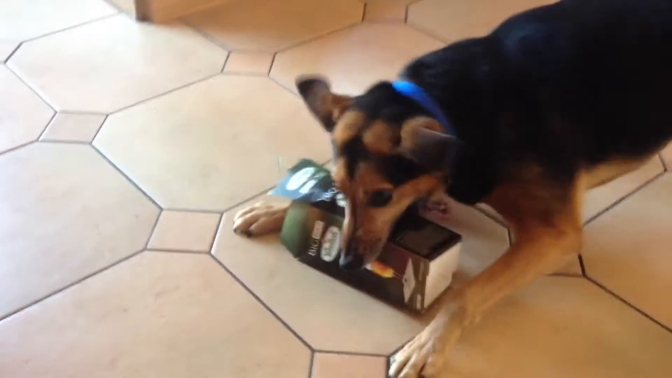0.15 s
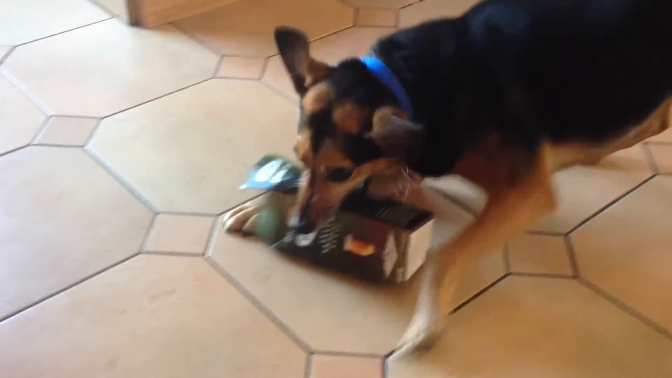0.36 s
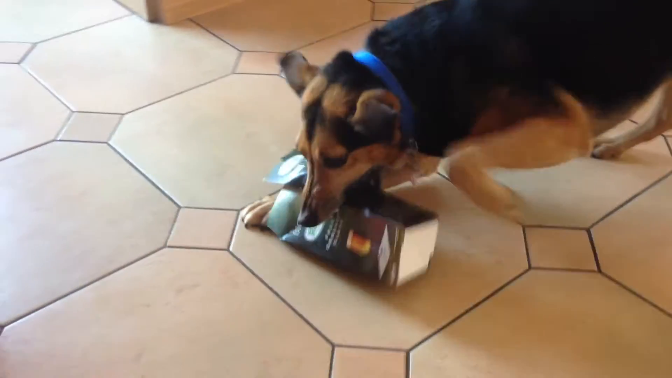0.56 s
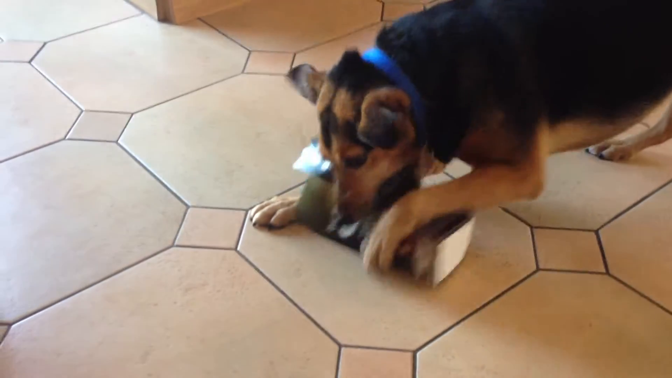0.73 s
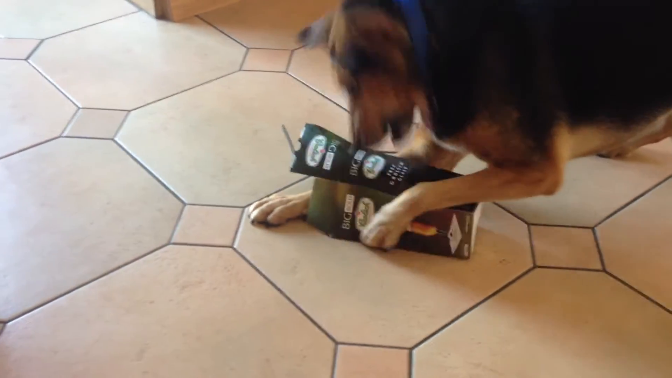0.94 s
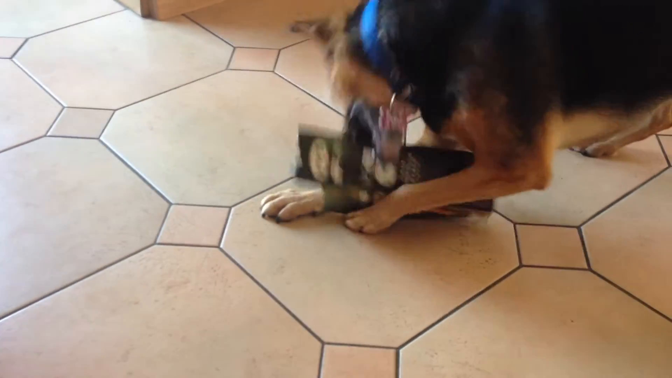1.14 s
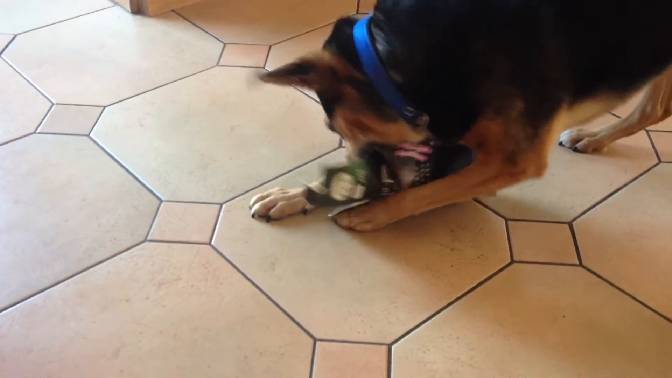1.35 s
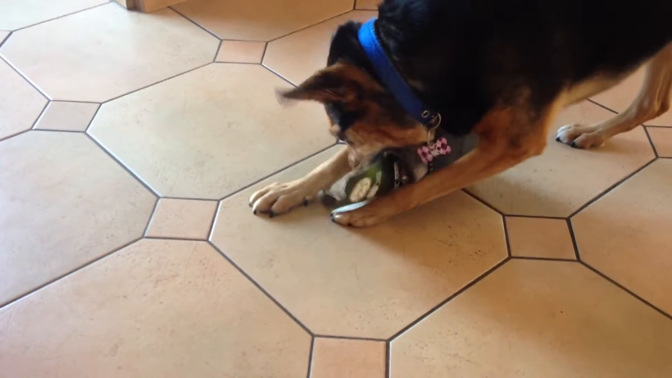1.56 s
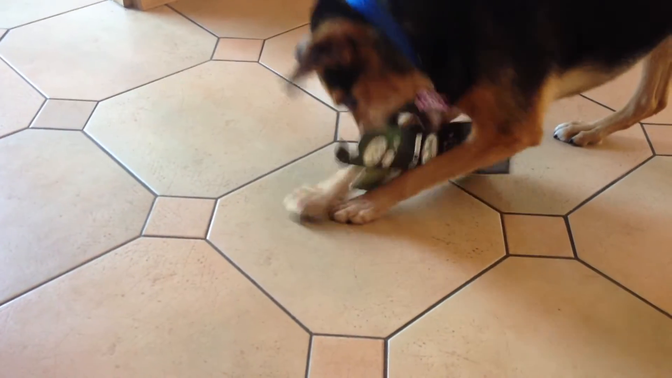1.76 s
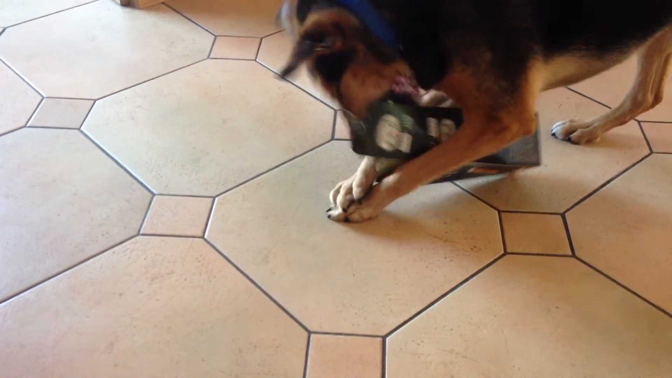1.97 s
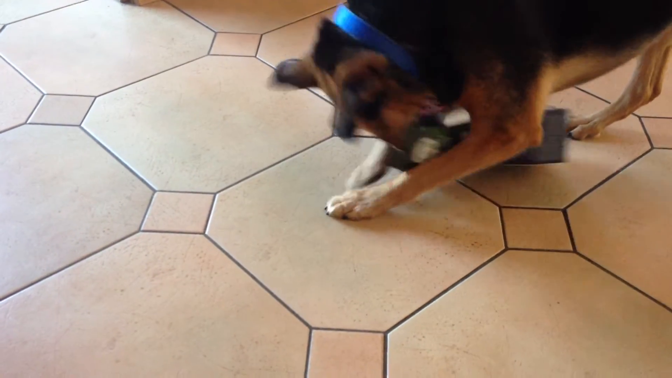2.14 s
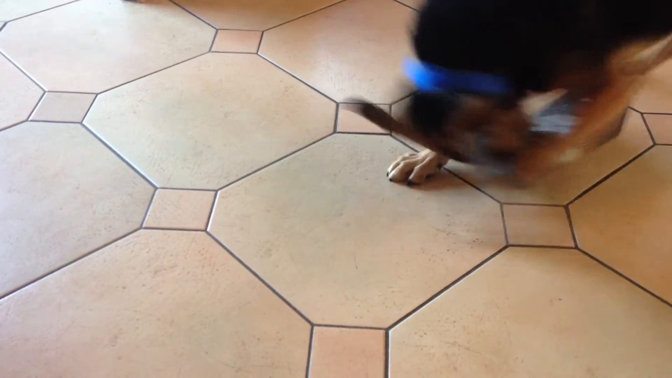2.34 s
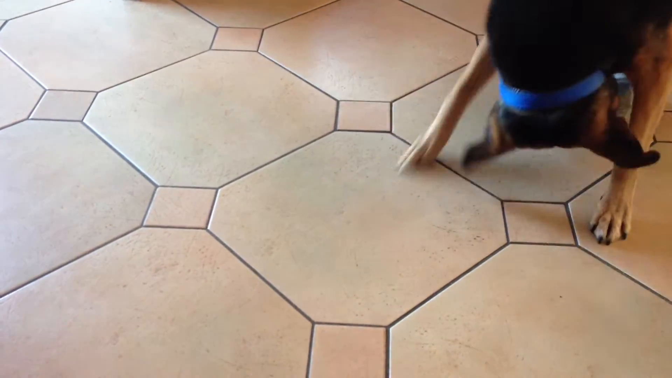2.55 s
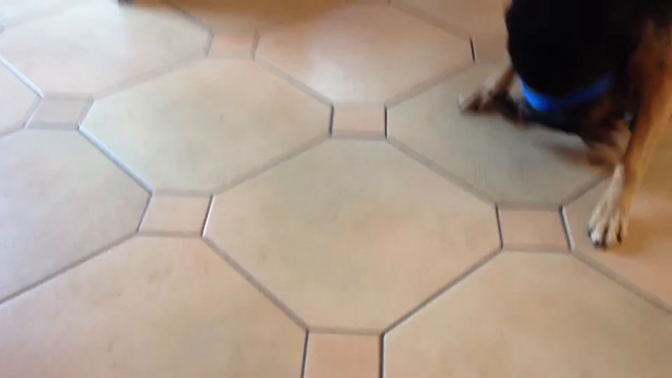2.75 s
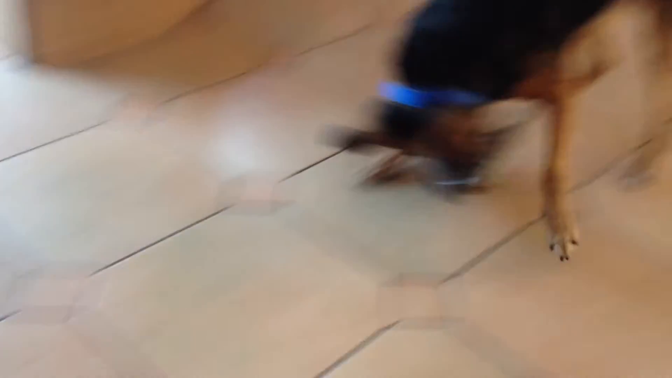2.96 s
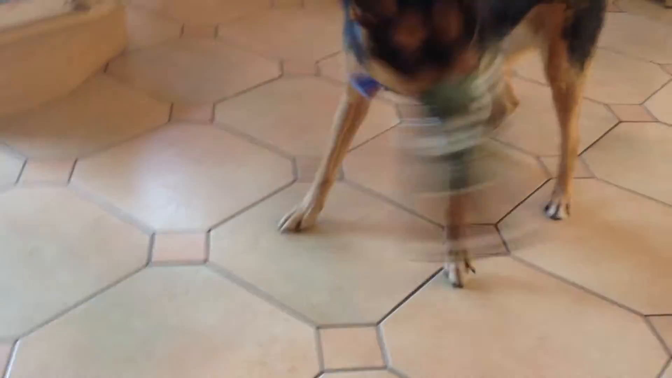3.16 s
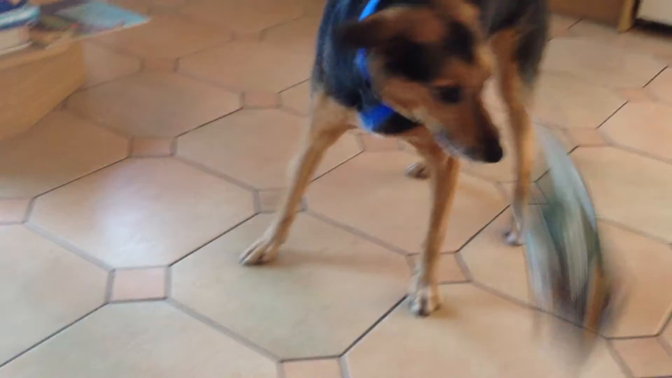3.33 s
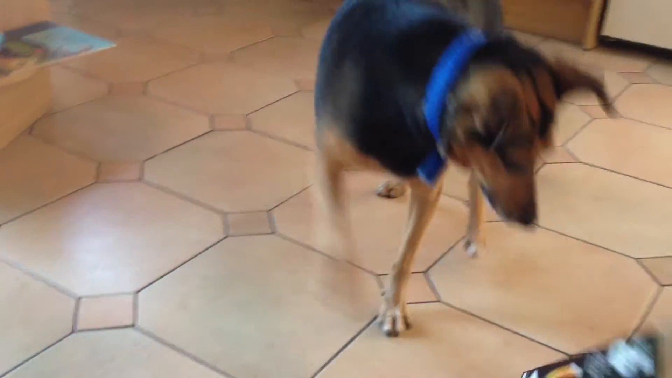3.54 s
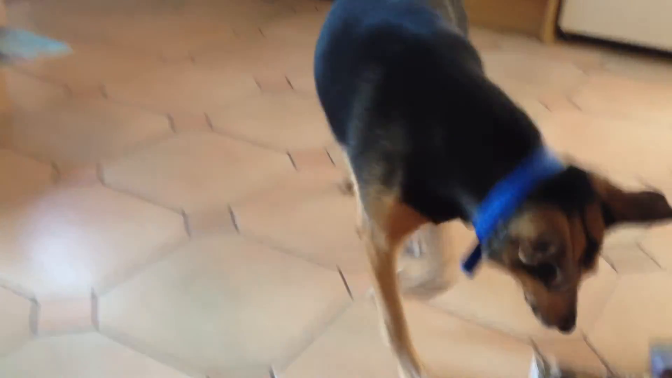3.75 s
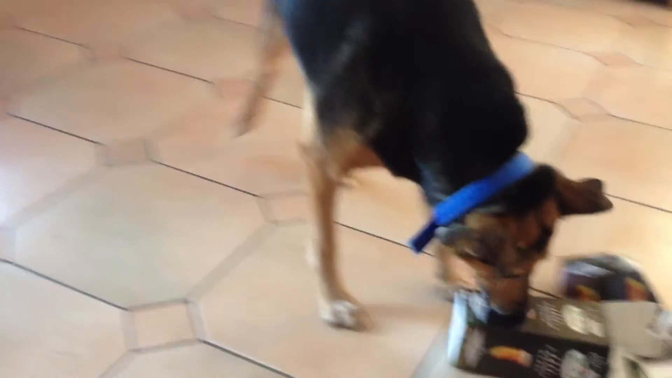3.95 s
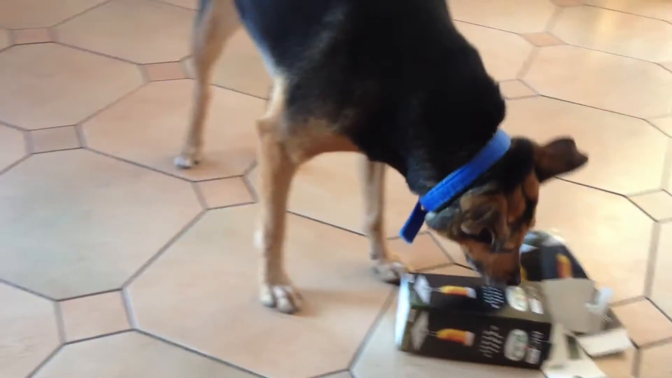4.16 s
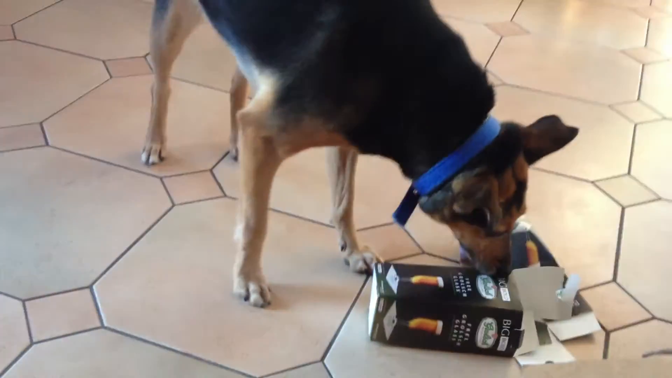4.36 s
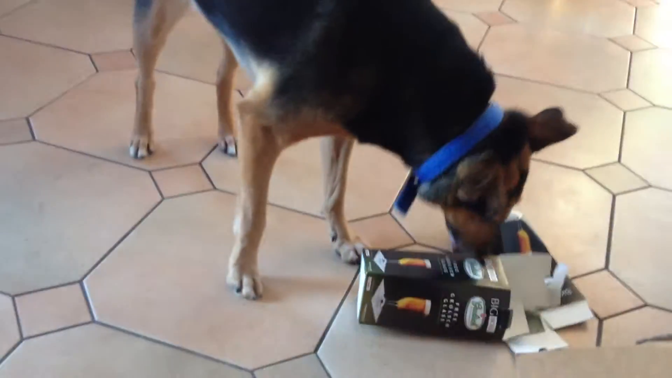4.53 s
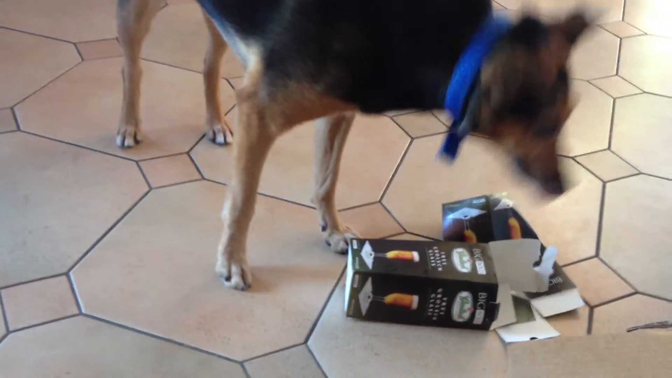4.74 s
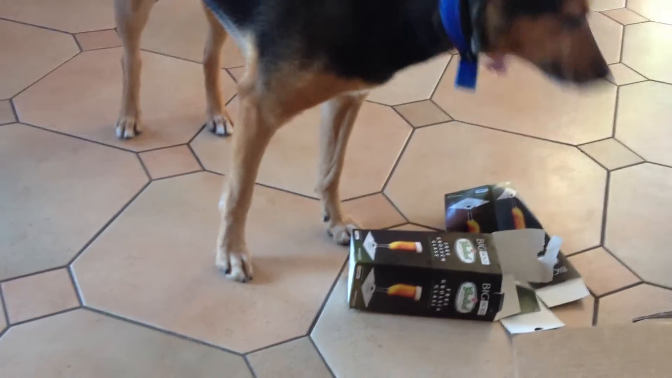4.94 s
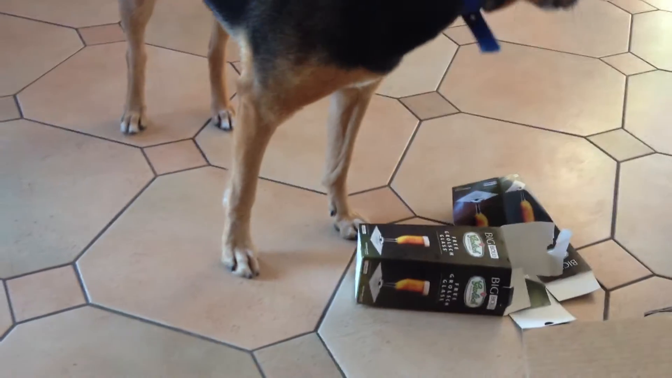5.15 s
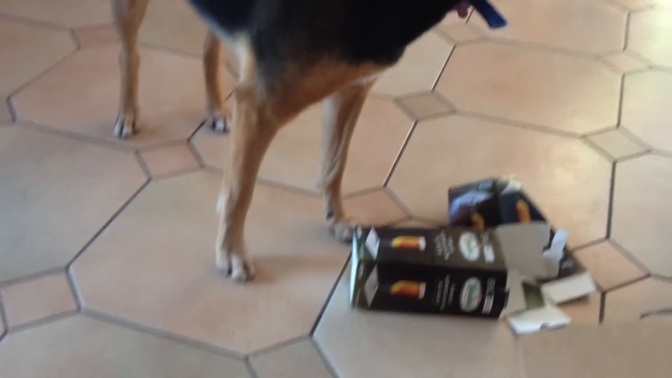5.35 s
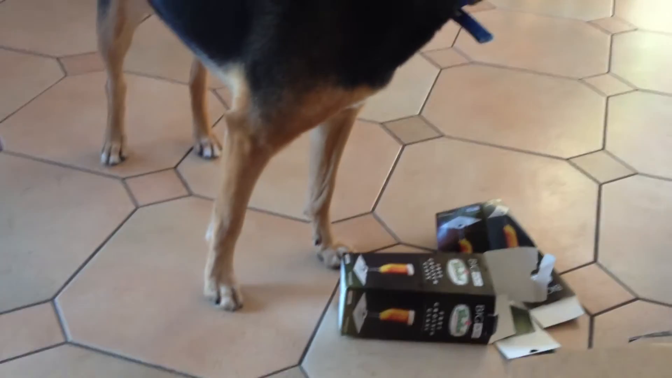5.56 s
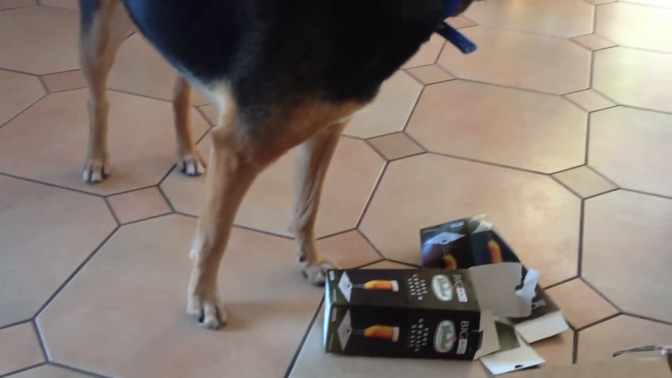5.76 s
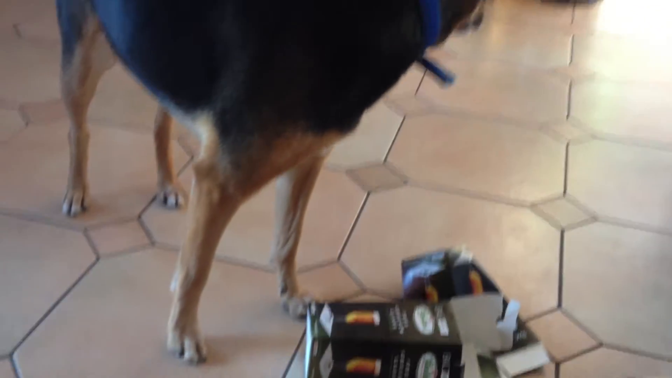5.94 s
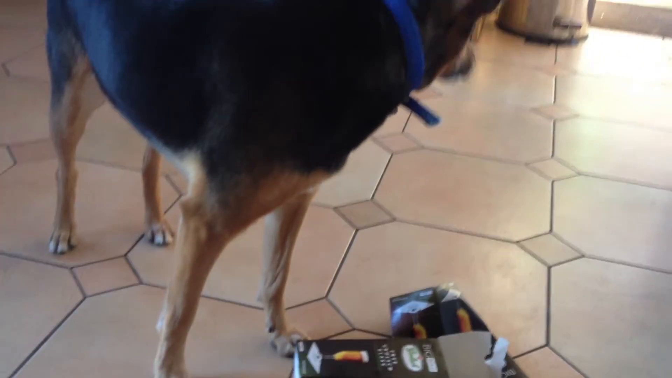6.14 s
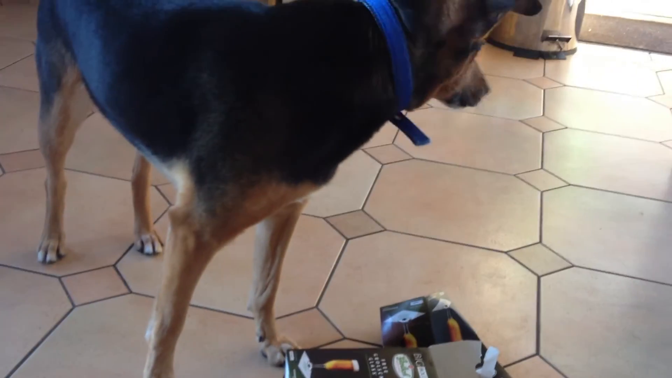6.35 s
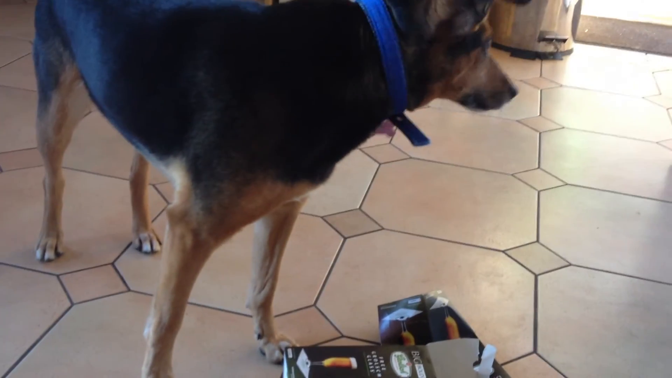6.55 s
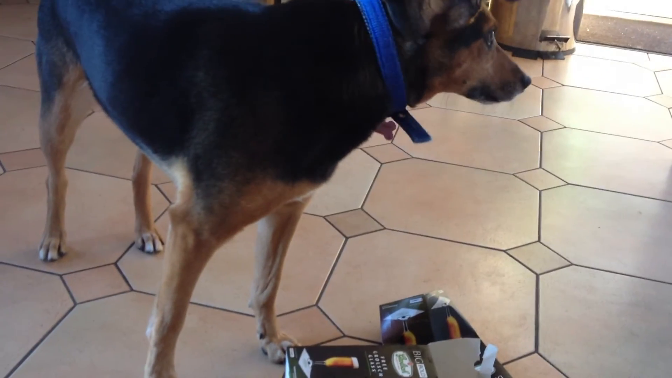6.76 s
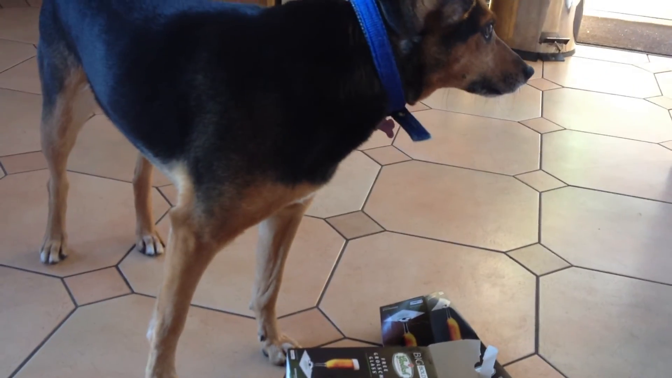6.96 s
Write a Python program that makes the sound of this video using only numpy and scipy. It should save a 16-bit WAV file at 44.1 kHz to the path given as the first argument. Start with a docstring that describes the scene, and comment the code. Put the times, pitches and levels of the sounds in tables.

```python
"""A dog paws, bites, drags and rips a cardboard box on a tiled floor: filtered bursts over stick-slip noise.
Collar tags ring as high sine modes, claws tick, glossy board squeaks, and a noise tail rings as the room.
Then the box is flung: it lands and bounces twice, its hollow ringing, and slides after each landing.
Toward the end gliding whistles and buzzy notes are left, probably birds outside the door.
Still room air and a faint hum lie under everything."""
import sys
import numpy as np
from scipy import signal
from scipy.fft import rfft, irfft, next_fast_len
from scipy.io import wavfile
from scipy.ndimage import map_coordinates

SR = 44100
rng = np.random.default_rng(int(sys.argv[2]) if len(sys.argv) > 2 else 0)


def materialize(psi):
    """Save the field psi as 16-bit PCM at rate SR to the path in sys.argv[1].

    A 1-D psi becomes a single channel; in a 2-D psi each row is a channel.
    """
    bounded = np.clip(np.atleast_2d(psi).T, -1, 1)
    quanta = np.round(bounded * 32767).astype(np.int16)
    wavfile.write(sys.argv[1], SR, quanta)


N = 313064
TIME = np.arange(N) / SR  # seconds, whole scene
SPAN = TIME[:SR * 3 // 5]  # seconds, room for one short event

# Spectrum of the hollow box. Each row: frequency in Hz, relative level in dB.
HOLLOW_SPECTRUM = [(190, -23.5), (330, -5.5), (408, -3), (576, 0.5), (620, -2), (755, 0), (868, -2.5),
                   (969, -5), (1030, -5), (1300, -4.5), (1480, -12), (1900, -22), (2470, -29), (4180, -120)]
# Spectrum of the low thump of the panels. Each row: frequency in Hz, relative level in dB.
THUMP_SPECTRUM = [(25, -35.5), (55, -45.5), (90, -31.5), (130, -7), (165, -3.5), (220, 3.5), (260, -2.5),
                  (320, 4), (400, -5), (600, -34)]
# Spectrum of stiff board cracking. Each row: frequency in Hz, relative level in dB.
CRACK_SPECTRUM = [(880, -26.5), (1500, -1), (1770, -5), (2140, -0.5), (2340, -2), (3830, -5), (4530, -2.5),
                  (5110, -9), (7730, -8.5), (14700, -30.5), (15900, -32)]
# Spectrum of claws and teeth on hard surfaces. Each row: frequency in Hz, relative level in dB.
CLAW_SPECTRUM = [(1200, -20.5), (3500, -13), (7500, -1.5), (9500, -7), (15500, -9)]


def amp(db):
    """Decibels to amplitude."""
    return 10 ** (np.asarray(db) / 20)


def unit(x):
    """Scale to an rms of 1."""
    return x / np.sqrt(np.mean(x ** 2) + 1e-20)


def unit_energy(x):
    """Scale to a total energy of 1."""
    return x / (np.linalg.norm(x) + 1e-20)


def along(points, hz):
    """Read a curve of (Hz, value) points on a log frequency axis."""
    f, v = np.transpose(points)
    return np.interp(np.log(hz + 1), np.log(f + 1), v)


def fade(t, t60):
    """Free decay, 60 dB in t60 seconds."""
    return np.exp(-np.log(1000) * t / t60)


def ring_of(hz, t60):
    """One decaying sine mode."""
    return np.sin(2 * np.pi * hz * SPAN) * fade(SPAN, t60)


def add(track, s, x):
    """Mix x into the track at s seconds."""
    start = max(round(s * SR), 0)
    track[start:start + len(x)] += x[:max(N - start, 0)]


def through(x, response):
    """Convolve, keeping the length."""
    return signal.fftconvolve(x, response)[:len(x)]


def colour(x, spectrum, size=4096):
    """Causal filter with the (Hz, dB) shape and unit energy."""
    magnitude = amp(along(spectrum, np.fft.rfftfreq(size, 1 / SR)))
    cepstrum = irfft(np.log(magnitude + 1e-5))
    # folding the cepstrum forward gives minimum phase
    cepstrum[1:size // 2] *= 2
    cepstrum[size // 2 + 1:] = 0
    return through(x, unit_energy(irfft(np.exp(rfft(cepstrum)))))


def wobble(rate, count=N):
    """A smooth random curve, rate knots a second."""
    knots = rng.standard_normal(int(count * rate / SR) + 4)
    return map_coordinates(knots, [np.arange(count) * rate / SR])


def tail(rise):
    """A fresh reverberant tail from tiles and walls: noise whose bands decay at their own pace, energy 1."""
    # Decay of the hard room. Each row: frequency in Hz, time to fall 60 dB in seconds.
    room_decay = [(100, 0.17), (260, 0.37), (700, 0.34), (1800, 0.34), (4800, 0.35), (13000, .38)]
    hz, t, bands = signal.stft(rng.standard_normal(len(SPAN)), SR, nperseg=256)
    bands = bands * fade(t, along(room_decay, hz)[:, None])
    decay = signal.istft(bands, SR, nperseg=256)[1][:len(SPAN)]
    return unit_energy(decay * (1 - np.exp(-SPAN / rise)))


def room(wet_db):
    """Direct sound plus tail, energy 1."""
    response = amp(wet_db) * tail(rise=0.001)
    response[0] += 1
    return unit_energy(response)


def slips(rate, spread_db, count=N):
    """Fibres catching and letting go: random impulses of unequal size, rate a second on average."""
    when = rng.random(count) < rate / SR
    size = rng.standard_normal(count)
    spread = amp(spread_db * np.clip(rng.standard_normal(count), -2, 2))
    return unit(when * size * spread)


def contact(t60, grit):
    """A sharp push followed by a short crunch of the board."""
    push = grit * unit_energy(rng.standard_normal(len(SPAN)) * fade(SPAN, t60))
    push[0] += 1
    return push


def crunch(t60, rise):
    """Fibres giving way under a blow: a noise burst that swells and dies."""
    return rng.standard_normal(len(SPAN)) * fade(SPAN, t60) * (1 - np.exp(-SPAN / rise))


def glide(length, start_hz, end_hz, waver_hz):
    """A swelling tone that slides in pitch; deep, fast wavering makes it raspy."""
    u = np.minimum(SPAN / length, 1)
    hz = end_hz + (start_hz - end_hz) * (1 - u) ** 1.1
    hz = hz + waver_hz * wobble(rate=1000, count=len(SPAN))
    swell = np.sqrt(np.abs(np.sin(np.pi * u)))
    return swell * np.sin(2 * np.pi * np.cumsum(hz) / SR)


def knocks():
    """Each blow flexes the panels, rings the hollow of the box and cracks on its stiff face."""
    # Blows on the box. Each row: start in seconds, force as a relative level in dB, relative thump in dB,
    # relative crack in dB, panel pitch in Hz, relative panel ring in dB, relative room in dB.
    blows = [(0.078, -32.5, 3.5, -10, 287, 6, 6), (0.089, -25, -15, -10, 680, 6, -3.5),
             (0.096, -19, -17.5, -20, 594, 11.5, 3), (0.22, -32, -3.5, -28, 650, 17, 12.5),
             (0.304, -20, -12, -15.5, 625, 12, 4), (0.342, -19.5, -10, -29, 551, 2.5, -1.5),
             (0.656, -21, -7, -19.5, 677, 9.5, -1.5), (0.703, -29, -5, -9.5, 339, 1, -5.5),
             (0.75, -12.5, -22, -17, 637, 8, -6), (0.764, -14, -14, -35, 614, 8, -3),
             (0.785, -14, -25, -16, 580, 8.5, 3), (1.036, -27.5, -14.5, -21, 640, 7, -4.5),
             (1.139, -28, -10.5, -7.5, 342, 8, 4.5), (1.169, -29, -9, -5, 347, -12, -1),
             (1.198, -18, -22, -14, 666, 4, -6), (1.666, -36, -9, -4.5, 627, -2, -2),
             (1.795, -33, -14, -5.5, 843, 20, -3.5), (1.815, -32, -8.5, -21, 300, 1, -2.5),
             (1.865, -29.5, -8.5, -11.5, 607, 9, 0), (1.942, -31, -18, -35, 638, 13, -5.5),
             (2.156, -33.5, -17.5, -14, 480, 10, 2), (2.21, -16.5, -17.5, -14, 800, -20, 2),
             (2.228, -25, -11, -23.5, 830, -2, -0.5), (2.348, -26.5, -11, -16, 370, 6, 9),
             (2.372, -20, -11, -14, 810, -13, 2.5), (2.476, -29.5, -9, -17, 477, 3, 1),
             (2.613, -37.5, -4, -29, 840, 1, 2.5), (2.723, -20.5, -10, -13.5, 520, 4, 4),
             (2.876, -33.5, -11.5, -15, 527, 7, 5.5), (3.001, -28, -7.5, -15.5, 589, 9, 4),
             (3.04, -28.5, -12.5, -19, 576, -10, -3.5), (3.259, -23.5, -9.5, -11, 727, 6, 1),
             (3.296, -28.5, -15, -21, 1144, 20, 1), (3.441, -7.5, -18.5, -16.5, 800, 4.5, 2),
             (3.696, -14, -15, -13.5, 920, -7, 1), (3.925, -18.5, -22, -13.5, 294, 2.5, -1),
             (3.971, -29, -14, -18, 296, -9, -4), (4.562, -39, -25, -6, 931, -1, 12),
             (4.612, -34.5, -2.5, -14, 241, 8, -5.5), (5.003, -39, -10.5, -13, 760, -1, 10)]
    # Modes of the air and walls of the box. Each row: frequency in Hz, relative level in dB,
    # time to fall 60 dB in seconds.
    cavity_modes = [(537, -5, 0.38), (655, 2.5, 0.38), (765, -1.5, 0.55), (837, 0, 0.35), (862, -12, 0.38),
                    (1125, -14.5, 0.43)]
    knock_wet_db, panel_ring_db = 2.5, -6  # offsets to each blow's room and panel ring
    # at 0 dB force, and the dB lost for each dB of softer blow
    cavity_db, cavity_per_db = 16.5, 2.5
    crack_top_db, top_per_db = 2, 0.17

    out = np.zeros(N)
    cavity = unit_energy(sum(amp(db) * ring_of(hz, t60) for hz, db, t60 in cavity_modes))
    for s, db, thump_db, crack_db, hz, ring_db, room_db in blows:
        wet_db = knock_wet_db + room_db
        blow = unit_energy(contact(t60=0.072, grit=0.818)) + amp(wet_db) * tail(rise=0.002)
        # the box sounds most around the pitch of the struck panel
        blow = colour(blow, [(hz / 2, -3.5), (hz, 0), (hz * 2, -3.5)])

        panel = unit_energy(through(ring_of(hz, t60=0.036), room(wet_db + 3.0)))
        hollow = unit_energy(colour(blow, HOLLOW_SPECTRUM))
        hollow = unit_energy(hollow + amp(panel_ring_db + ring_db) * panel)
        # only a hard blow sets the whole cavity ringing strongly
        hollow = hollow + amp(cavity_db + cavity_per_db * db) * cavity

        thump = unit_energy(colour(blow, THUMP_SPECTRUM))

        # soft blows crush the board slowly, hard ones snap it
        rise = 0.00077 * amp(-0.7 * db)  # seconds
        snap = unit_energy(crunch(t60=0.014 + 5 * rise, rise=rise)) + amp(wet_db) * tail(rise=3 * rise)
        top_tilt = [(3000, 0.00076), (12000, crack_top_db + top_per_db * db)]
        crack = unit_energy(colour(colour(snap, CRACK_SPECTRUM), top_tilt))

        layers = amp(21.5) * hollow + amp(thump_db + 28.0) * thump + amp(crack_db + 25.0) * crack
        add(out, s, amp(db) * layers)
    return out


def rips():
    """Tearing, crushing and scraping: a run of snapping fibres crackles and drives the box."""
    # Each row: start in seconds, length of the pull in seconds, relative level in dB, brightness in dB.
    tears = [(0.0, 0.07, -54, 16.5), (0.084, 0.041, -35.5, 0), (0.258, 0.03, -50, 16),
             (0.311, 0.06, -36.5, -6), (0.696, .035, -33.5, -7.5), (0.735, .03, -23, 0.5),
             (0.99, .12, -39, 5.5), (1.309, 0.156, -44, -11), (1.54, 0.069, -46, -12),
             (1.654, .035, -50, 13.5), (1.696, 0.11, -51.5, 10), (1.807, 0.087, -51, 3),
             (2.014, 0.081, -52, 6.5), (2.363, .055, -37, 11.5), (2.412, .08, -39, -12),
             (2.568, .05, -52.5, 16.5), (2.674, 0.054, -46, 13.5), (2.699, .09, -29.5, -2.5),
             (2.927, .09, -45.5, 12), (3.255, .06, -42.5, -1), (4.369, 0.1, -49.5, 5),
             (4.42, 0.2, -54.5, 8), (4.55, 0.26, -53.5, 2), (4.978, 0.071, -46.5, -10),
             (5.3, 0.46, -63.5, 2)]
    out = np.zeros(N)
    for s, length, db, bright_db in tears:
        pull = np.sin(np.pi * np.minimum(SPAN / length, 1))
        snaps = pull * slips(rate=870, spread_db=1.5, count=len(SPAN))
        sound = amp(-5 - bright_db / 2) * colour(snaps, HOLLOW_SPECTRUM)
        sound += amp(-5.0) * colour(snaps, CRACK_SPECTRUM)
        sound += amp(bright_db - 12.0) * colour(snaps, CLAW_SPECTRUM)
        add(out, s, amp(db) * through(sound, room(wet_db=1)))
    return out


def drag():
    """Board sticks and slips on tile and teeth; its panels rumble. Skids die away as the box slows."""
    # The box dragged and chewed; teeth raise the brightness, a paw's weight lowers it.
    # Each row: time in seconds, effort as a relative level in dB, brightness in dB.
    drag_curve = [(0.0, -42.5, -3), (0.18, -48, -1), (0.3, -46, 3.5), (0.45, -51.5, 0.5), (0.62, -52, 3),
                  (0.93, -47.5, 1.5), (1.03, -42, 3), (1.28, -44, 2), (1.62, -52, 4.5), (1.85, -48.5, -0.5),
                  (2.15, -53.5, 0), (2.38, -44.5, -5.5), (2.57, -51.5, -9), (2.74, -43, -2),
                  (2.95, -48.5, 1.5), (3.07, -42.5, -6), (3.21, -56.5, 8), (3.44, -49, -1)]
    # The flung box slides on after each landing.
    # Each row: start in seconds, starting effort as a relative level in dB, brightness in dB.
    skids = [(3.48, -40.5, -2.5), (3.75, -43.5, 2), (3.97, -44, 0)]
    # Spectrum of gritty board on tile. Each row: frequency in Hz, relative level in dB.
    grit_spectrum = [(880, -31.5), (1500, -1.5), (1940, 0), (2230, -0.5), (2970, -3), (4630, -3.5),
                     (5160, -8.5), (7650, -6.5), (9800, -18), (14300, -16.5), (15300, -21.5), (15900, -30)]
    skid_slows_db_per_s = 72.5

    s, effort_db, bright_db = np.transpose(drag_curve)
    effort = amp(np.interp(TIME, s, effort_db, right=-120))
    bright = amp(np.interp(TIME, s, bright_db))
    for start, db, skid_bright_db in skids:
        add(effort, start, amp(db - skid_slows_db_per_s * SPAN))
        bright = np.where(TIME < start, bright, amp(skid_bright_db))
    pressure = effort * amp(0.62 * wobble(rate=25))

    rumble = amp(-7.0) / bright * unit(colour(slips(rate=360, spread_db=3.5), THUMP_SPECTRUM))
    rub = amp(-1.5) * unit(colour(slips(rate=1300, spread_db=3.5), HOLLOW_SPECTRUM))
    grit = amp(-7.0) * bright * unit(colour(slips(rate=2200, spread_db=0.0), grit_spectrum))
    return through(pressure * (rumble + rub + grit), room(wet_db=0.0))


def squeaks():
    """Fast, nearly regular stick-slip on the glossy face of the box, as a raspy gliding tone."""
    # Board squeaking under teeth and claws or on the tiles. Each row: start in seconds, length in seconds,
    # start pitch in Hz, end pitch in Hz, relative level in dB, depth of the raspy pitch waver in Hz.
    squeals = [(0.70, 0.039, 1747, 1270, -33, 170), (0.737, 0.032, 2210, 1934, -28, 380),
               (2.415, 0.029, 3325, 3560, -38, 385), (2.695, 0.044, 4690, 4490, -42.5, 170),
               (2.86, 0.044, 720, 640, -45, 30), (2.92, 0.072, 610, 650, -38, 39.8),
               (3.01, 0.052, 1657, 1812, -44, 167), (3.282, 0.076, 2780, 2615, -48, 300),
               (3.47, 0.102, 844.5, 788, -29.5, 30), (3.57, 0.13, 780, 800, -43.5, 25)]
    out = np.zeros(N)
    for s, length, start_hz, end_hz, db, rasp_hz in squeals:
        squeal = glide(length, start_hz, end_hz, rasp_hz)
        add(out, s, amp(db + 2) * through(squeal, room(wet_db=-1.0)))
    return out


def ticks():
    """Claws and teeth click on hard surfaces: very short crunches with a bright colour."""
    # Each row: start in seconds, relative level in dB.
    clicks = [(0.3232, -32), (0.3536, -31.5), (0.7357, -21), (0.9852, -34.5), (2.3875, -23), (2.599, -31),
              (2.6728, -30), (3.1837, -31), (4.4947, -38.5), (4.785, -46)]
    out = np.zeros(N)
    for s, db in clicks:
        click = unit_energy(crunch(t60=0.011, rise=0.0003)) + amp(3.0) * tail(rise=0.0026)
        add(out, s, amp(db + 14.0) * unit_energy(colour(click, CLAW_SPECTRUM)))
    return out


def tags():
    """Small metal tags touch and ring with a few high modes, wavering as they swing."""
    # Collar tags striking each other. Each row: start in seconds, relative level in dB.
    jingles = [(0.45, -48.5), (1.152, -37), (1.165, -29), (3.404, -42), (5.04, -44)]
    # Modes of a struck tag. Each row: frequency in Hz, relative level in dB.
    tag_modes = [(6783, -1), (7843, -5.5), (12030, -10), (14230, -9), (14420, -1.5)]
    # A second tag rings with one soft note of its own. Each row: start in seconds, relative level in dB.
    pings = [(0.0, -43.5), (3.845, -54)]
    ping_hz, tag_ring_s, tag_wet_db = 5866, 0.15, -6.5  # the ring falls 60 dB in tag_ring_s

    out = np.zeros(N)
    attack = 1 - np.exp(-SPAN / 0.00083)
    for touches, modes in ((jingles, tag_modes), (pings, [(ping_hz, 0)])):
        for s, db in touches:
            for hz, mode_db in modes:
                swing = amp(2.5 * wobble(rate=60, count=len(SPAN)))
                add(out, s, amp(db + mode_db) * swing * ring_of(hz, tag_ring_s) * attack)
    return through(out, room(wet_db=tag_wet_db))


def birds():
    """Thin falling whistles and buzzy notes, gliding tones smeared by the room."""
    # Clear falling whistles. Each row: start in seconds, start pitch in Hz, relative level in dB.
    whistles = [(4.84, 4920, -63.5), (5.305, 5130, -63), (5.548, 13600, -73), (5.765, 4960, -64),
                (6.199, 4850, -59.5)]
    # Buzzy notes. Each row: start in seconds, length in seconds, centre pitch in Hz, relative level in dB.
    buzzes = [(5.46, 0.065, 6100, -63), (5.454, 0.18, 4020, -68.5), (5.502, 0.102, 2835, -69),
              (5.688, 0.051, 6030, -62), (5.79, 0.034, 7400, -67), (5.818, 0.117, 4270, -71.5),
              (5.904, 0.048, 6000, -58.5), (5.92, 0.042, 2350, -74), (6.01, 0.042, 7620, -68),
              (6.024, 0.082, 3620, -70.5), (6.291, 0.14, 3800, -71), (6.328, 0.26, 4870, -68.5),
              (6.375, 0.039, 2350, -72), (6.71, 0.19, 4660, -65.5), (6.84, 0.07, 5720, -65),
              (6.994, 0.084, 6930, -56.5), (7.009, 0.1, 3320, -68)]
    whistle_s, whistle_fall, whistle_waver_hz = 0.1, 0.87, 50  # length, end over start pitch, waver depth
    # longer buzzes waver deeper and are the raspier
    buzz_fall_hz, buzz_depth_hz, buzz_widens_hz_per_s = 175.8, 200, 1290

    out = np.zeros(N)
    for s, hz, db in whistles:
        note = glide(whistle_s, hz, hz * whistle_fall, whistle_waver_hz)
        add(out, s, amp(db + 4.5) * through(note, room(wet_db=2.5)))
    for s, length, hz, db in buzzes:
        depth_hz = buzz_depth_hz + buzz_widens_hz_per_s * length
        note = glide(length, hz + buzz_fall_hz / 2, hz - buzz_fall_hz / 2, depth_hz)
        add(out, s, amp(db + 5.5) * through(note, room(wet_db=1.0)))
    return out


def background():
    """Still room air as coloured noise, and the faint hum of an appliance as unsteady sines."""
    # Spectrum of the still air. Each row: frequency in Hz, relative level in dB.
    air_spectrum = [(15, -58), (25, -29.5), (64, -13.5), (206, -1), (543, -6.5), (933, -8), (1010, -5),
                    (1190, -9), (1560, -9), (3500, -12.5), (4720, -11), (7880, -16), (9780, -24.5),
                    (14700, -16), (15900, -21.5)]
    # Tones of the hum. Each row: frequency in Hz, relative level in dB.
    hum_tones = [(209.9, -77.5), (845.2, -83), (1001, -79), (1550, -83)]
    air_db = -68  # rms ahead of the microphone

    air = amp(air_db) * unit(colour(rng.standard_normal(N), air_spectrum))
    hum = np.zeros(N)
    for hz, db in hum_tones:
        phase = 2 * np.pi * hz * TIME + 0.7 * wobble(rate=6)
        hum += amp(db + 0.5) * np.sin(phase)
    return air + hum


def scene():
    """All sources summed into one channel."""
    box = knocks() + rips() + drag() + squeaks()
    dog = ticks() + tags()
    return (box + dog + birds() + background())[None]


def record(dry):
    """The small microphone loses the deep bass and keeps nothing above its band limit."""
    top_hz = 15600
    size = next_fast_len(N + SR)
    highpass = signal.butter(4, 105, "highpass", fs=SR, output="sos")
    thin = signal.sosfilt(highpass, dry)
    in_band = np.fft.rfftfreq(size, 1 / SR) < top_hz
    return irfft(rfft(thin, size) * in_band, size)[:, :N]


dry = scene()
out = record(dry)
materialize(out)
```